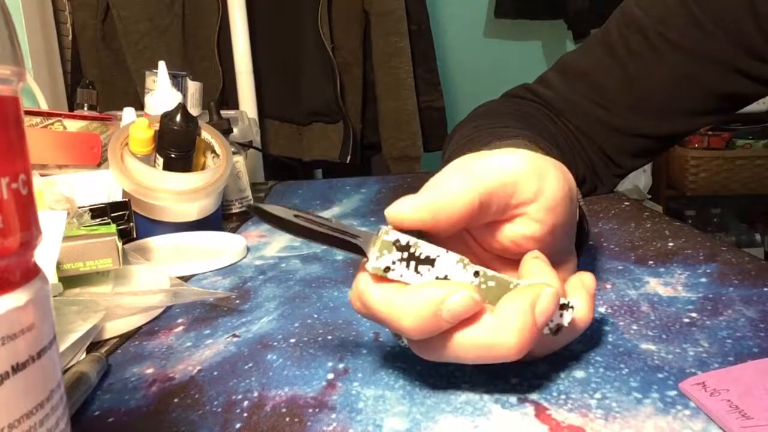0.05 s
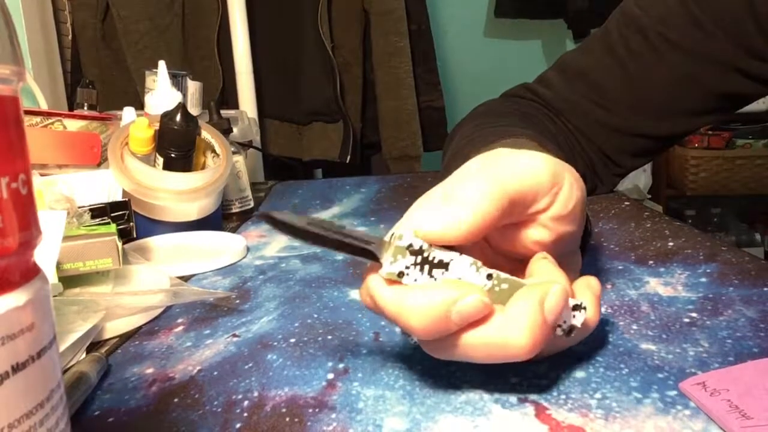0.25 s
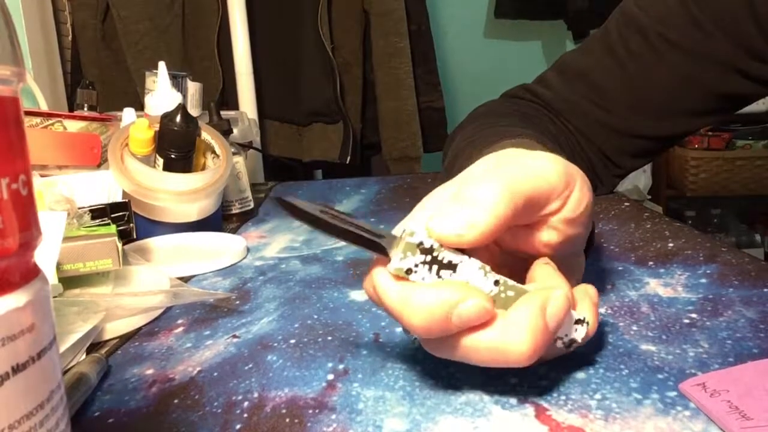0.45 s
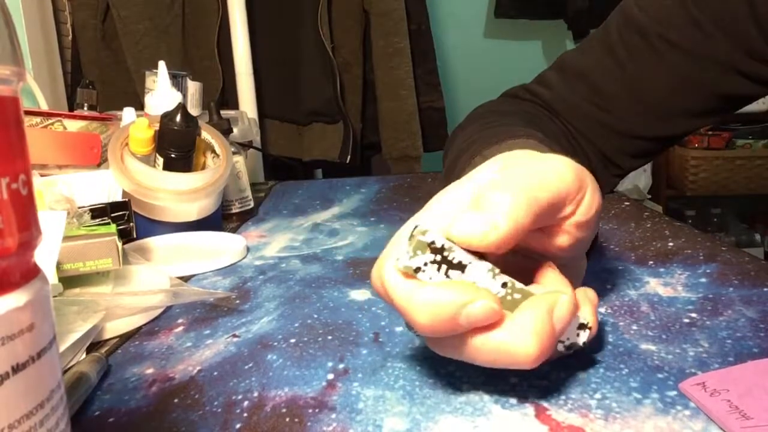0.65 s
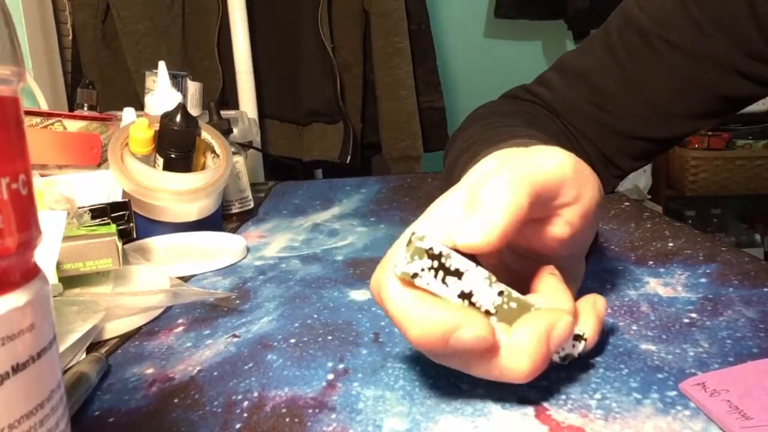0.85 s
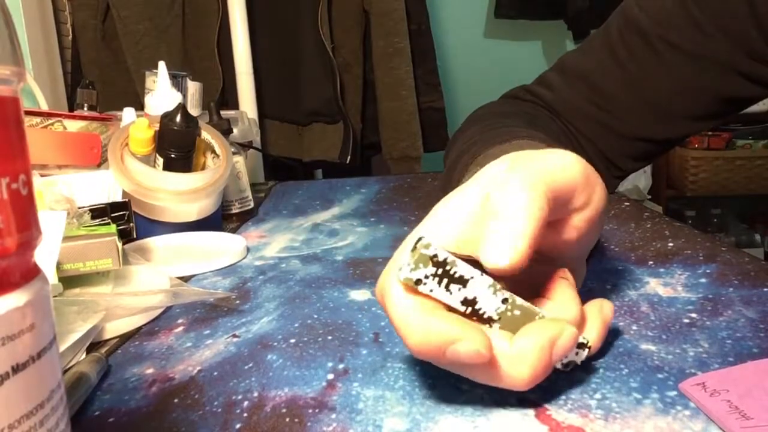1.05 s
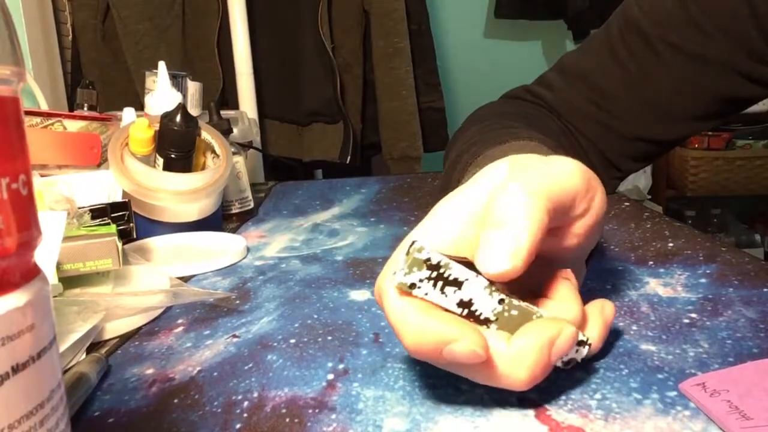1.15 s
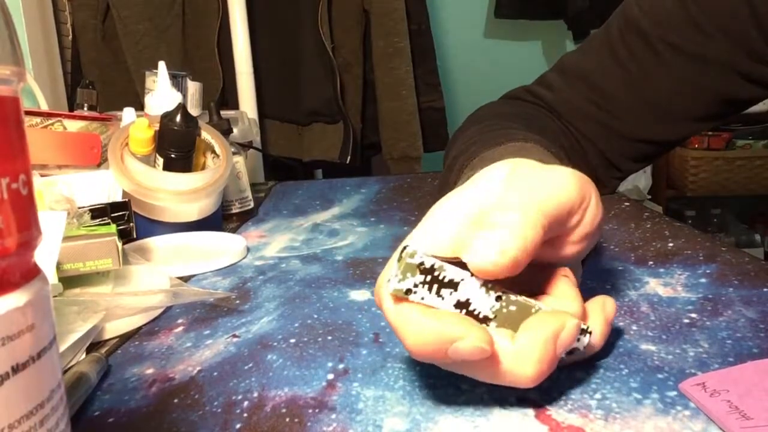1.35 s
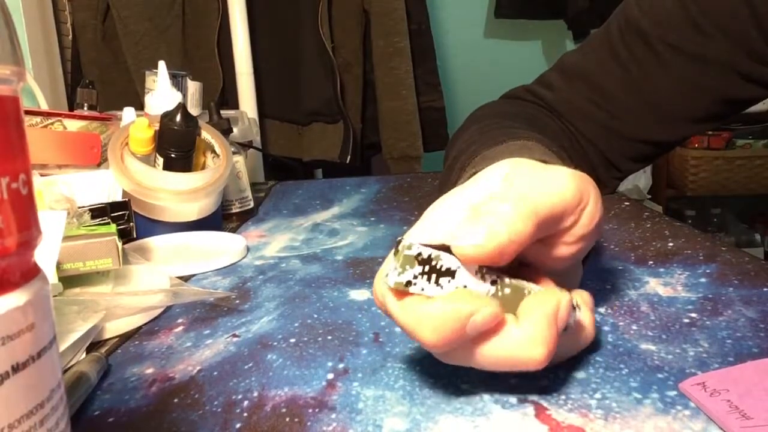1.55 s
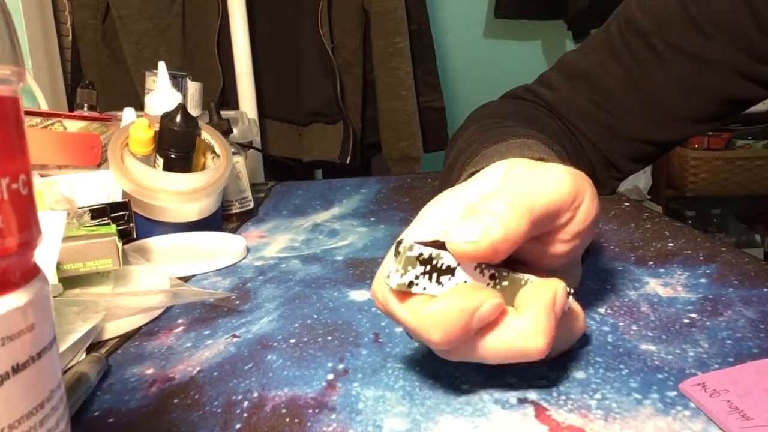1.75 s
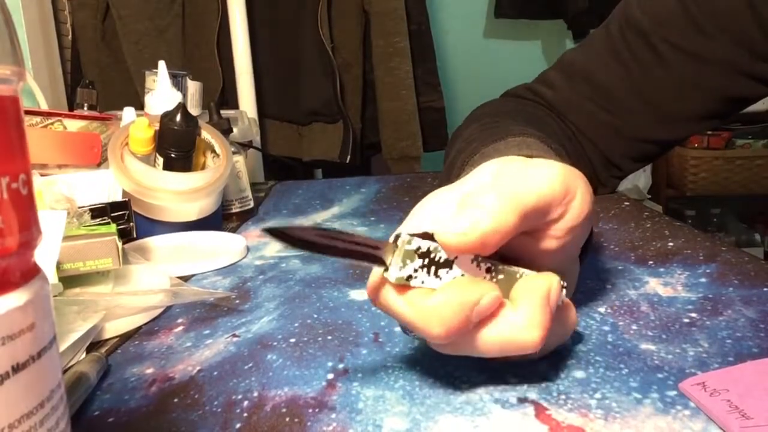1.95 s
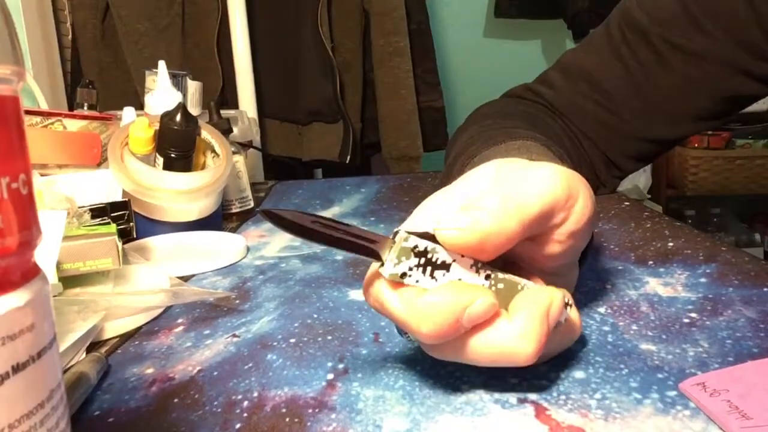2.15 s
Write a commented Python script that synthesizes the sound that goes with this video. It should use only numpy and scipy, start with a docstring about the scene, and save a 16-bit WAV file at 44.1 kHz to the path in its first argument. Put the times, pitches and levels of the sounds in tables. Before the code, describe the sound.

A spring-loaded knife blade snaps in, then snaps back out, with sharp metallic clicks.

```python
"""A spring-loaded knife, held over a desk in a small quiet room, snaps its blade in and later out.
Each snap is a latch letting go, a short scrape of gritty noise along the track and the blade chattering
against its stop: noise bursts coloured by the handle, with steel modes ringing on and a diffuse room tail.
Swelling sines thump in the handle and hand; around the snaps the thumb slider and the spring tick faintly.
Shaped noise makes the quiet room and the rumble of the grip."""
import sys
import numpy as np
from scipy import signal
from scipy.fft import rfft, irfft
from scipy.io import wavfile
from scipy.ndimage import uniform_filter1d, minimum_filter1d

SR = 44100
rng = np.random.default_rng(int(sys.argv[2]) if len(sys.argv) > 2 else 0)


def to_wav(s):
    """Save 16-bit WAV."""
    ch = np.atleast_2d(s).T  # columns
    pcm = np.round(np.clip(ch, -1, 1) * 32767)  # PCM
    wavfile.write(sys.argv[1], SR, pcm.astype(np.int16))


N = 97681  # length [samples]
ROOM_DELAY_S = 0.0055  # from a contact to the start of its room tail

# colour of the inward blade contacts and of every scrape: (frequency [Hz], level [dB])
CLOSING_COLOUR = [(100, -26), (600, -20.5), (950, -36.5), (1400, -21), (2100, -18.5), (2700, -9),
                  (3300, -17), (4100, -9), (4800, -10.5), (5800, 0), (8400, 0), (9200, -3.5), (12000, -1.5),
                  (15500, -0.5)]


def amp(db):
    """Decibels to gain."""
    return 10 ** (np.asarray(db) / 20)


def unit(x):
    """Scales to rms 1."""
    return x / np.sqrt(np.mean(x ** 2) + 1e-20)


def read(points, hz):
    """Reads a table on a log-frequency axis."""
    table_hz, value = np.transpose(points)
    return np.interp(np.log(hz + 1), np.log(table_hz + 1), value)


def add(mix, start_s, sound):
    """Mixes a sound in at a time, cut off at the end of the mix."""
    part = mix[max(round(start_s * SR), 0):][:len(sound)]
    part += sound[:len(part)]


def noise(colour):
    """Steady noise of a given spectrum, at rms 1."""
    hz = np.fft.rfftfreq(N, 1 / SR)
    spectrum = rfft(rng.standard_normal(N)) * amp(read(colour, hz))
    return unit(irfft(spectrum, N))


def background():
    """Quiet room noise and the rumble of the shifting grip, each a coloured noise."""
    # spectrum of the quiet room: (frequency [Hz], relative level per Hz [dB])
    floor_colour = [(15, -57), (25, -23), (35, -7), (49, 0.5), (140, -5.5), (183, -6.5), (313, -12.5),
                    (433, -17.5), (469, -18.5), (666, -18.5), (1170, -21.5), (1750, -21), (15500, -31)]
    # rumble of the grip: (time [s], level [dB])
    grip_levels = [(0, -66), (.3, -67.5), (.8, -74.5), (1.3, -68.5), (1.55, -61.5), (1.78, -66.5),
                   (2.05, -86.5), (2.2, -65.5)]
    # spectrum of that rumble: (frequency [Hz], relative level [dB])
    grip_colour = [(25, -22.5), (70, 1), (160, 0), (300, -13), (700, -29.5), (3000, -40), (16000, -48.5)]
    floor_db = -67.5
    grip_gain = amp(np.interp(np.arange(N) / SR, *np.transpose(grip_levels)))
    return amp(floor_db) * noise(floor_colour) + grip_gain * noise(grip_colour)


def coloured(x, points, tilt_db=0, size=2048):
    """Causal filter of unit energy with the given spectrum, tilted per octave above 2 kHz."""
    hz = abs(np.fft.fftfreq(size, 1 / SR))
    octaves = np.log2(np.maximum(hz, 2000) / 2000)
    log_gain = np.log(amp(read(points, hz) + tilt_db * octaves))
    # minimum phase: the energy comes as early as the spectrum allows
    spectrum = np.exp(np.conj(signal.hilbert(log_gain)))
    taps = np.fft.ifft(spectrum).real[:size // 2]
    return signal.fftconvolve(x, taps / np.linalg.norm(taps))[:len(x)]


def resonant(x, peaks):
    """Lifts each resonance out of the sound, so that it rings briefly."""
    for hz, width_hz, boost_db in peaks:
        b, a = signal.iirpeak(hz, hz / width_hz, fs=SR)
        x = x + (amp(boost_db) - 1) * signal.lfilter(b, a, x)
    return x


def ring(modes):
    """Dying sine modes, each struck at a random phase."""
    t = np.arange(SR // 2) / SR
    total = np.zeros(len(t))
    for hz, db, t60 in modes:
        total += amp(db - 60 * t / t60) * np.sin(2 * np.pi * (hz * t + rng.random()))
    return total


def contact(decay_s, size=4096):
    """Metal meets metal: a crack, a burst of chatter and a weaker rattle, even in spectrum."""
    crack = 0.45  # relative to the energy of the chatter and rattle
    rattle_db, rattle_s = -22, 0.003
    smooth_hz = 256
    t = np.arange(size) / SR
    envelope = np.exp(-t / decay_s) + amp(rattle_db) * np.exp(-t / rattle_s)
    burst = envelope * rng.standard_normal(size)
    burst[0] += crack * np.linalg.norm(envelope)
    # even out the broad spectrum, leaving its fine grain
    spectrum = rfft(burst, 2 * size)
    power = uniform_filter1d(abs(spectrum) ** 2, max(round(smooth_hz * 2 * size / SR), 1))
    even = irfft(spectrum / np.sqrt(power))[:size]
    return unit(even) * np.sqrt(np.mean(envelope ** 2))


def room(colour, size=256):
    """One short dense reverberant tail of noise, each band dying at its own speed."""
    # reverberation time: (frequency [Hz], time to fall 60 dB [s])
    room_t60 = [(100, .15), (1000, 0.11), (3000, 0.16), (7000, 0.26), (11000, .18), (16000, .16)]
    hz, t, bands = signal.stft(rng.standard_normal(SR // 2), SR, nperseg=size)
    t60 = read(room_t60, hz)[:, None]
    # the root gives long and short bands equal energy before the colour
    gain = amp(read(colour, hz))[:, None] * np.sqrt(2 * np.log(1000) / (t60 * SR))
    decay = np.exp(-np.log(1000) * t / t60)
    return signal.istft(bands * gain * decay, SR, nperseg=size)[1]


def ticks():
    """The slider catches, the stretched spring sings faintly and the room answers."""
    # slider and spring ticks: (time [s], level [dB], decay [s], tilt [dB per octave],
    # main resonance [Hz], spring ring relative to the tick [dB])
    tick_events = [(0.2012, -38.5, 0.0018, -3, 5300, -36.5), (0.463, -52, 0.00086, -1.5, 6070, -40.5),
                   (1.1891, -30, 0.00064, 3, 7500, -18.5), (1.468, -59, 0.00066, -7.5, 6150, -42.5),
                   (1.489, -58.5, 0.0014, -2.5, 11730, -40), (1.5182, -49.5, .001, 0.5, 8400, -45),
                   (1.5228, -37.5, 0.00097, 7.5, 13370, -45), (1.595, -55.5, 0.00087, -3, 6000, -38.5),
                   (1.6205, -52, 0.00072, -11.5, 2030, -39), (1.6641, -31, 0.00091, 6, 8250, -28),
                   (1.7999, -60, .003, -4.5, 6380, -42)]
    # colour of the ticks: (frequency [Hz], level [dB])
    tick_colour = [(200, -22.5), (1400, -25.5), (3000, 0), (4000, -11.5), (5400, -5.5), (8200, 0.5),
                   (10700, -9), (12500, 1), (14200, 2.5), (16000, -14.5)]
    # colour of their room tail: (frequency [Hz], level [dB])
    tick_wash = [(100, -25), (2600, -9.5), (7000, -16), (15000, -18.5)]
    # modes of the spring: (frequency [Hz], relative level [dB], time to fall 60 dB [s])
    spring_modes = [(2570, -3.5, .2), (5179, -4.5, .4), (5890, -3.5, .3), (6525, -3, .3), (7200, -3, .25),
                    (7768, 0.5, .19), (8570, -2, .19), (10730, -1.5, .2)]
    width_hz, boost_db = 400, 7
    out = np.zeros(N)
    for s, db, decay_s, tilt_db, hz, ring_db in tick_events:
        catch = coloured(contact(decay_s), tick_colour, tilt_db)
        tick = amp(db) * resonant(catch, [(hz, width_hz, boost_db)])
        add(out, s, tick)
        add(out, s, amp(db + ring_db) * ring(spring_modes) / len(spring_modes))
        add(out, s + ROOM_DELAY_S, signal.fftconvolve(tick, room(tick_wash)))
    return out


def recoil():
    """Jolts of the handle and dull thumps of the hand: sines that swell quickly and die away."""
    # jolts and thumps: (time [s], level at the peak of the swell [dB], pitch [Hz], swell time [s])
    thumps = [(0.214, -51, 140, 0.0049), (0.22, -48.5, 72, 0.0066), (0.5, -39.5, 90, 0.0052),
              (.504, -46, 596.5, 0.00058), (0.5034, -45.5, 190, .003), (1.665, -51, 78, .012),
              (1.806, -38, 95, .008), (1.8559, -6.5, 1200, 0.00022), (1.8571, -12, 212.4, 0.0009),
              (1.857, -15.5, 439, .0006), (1.8604, -22, 69.96, 0.0025)]
    out, t = np.zeros(N), np.arange(SR // 4) / SR
    for s, db, hz, swell_s in thumps:
        swell = t / swell_s * np.exp(1 - t / swell_s)
        add(out, s, amp(db) * swell * np.sin(2 * np.pi * hz * t))
    return out


def small_parts(count=40):
    """Weak, uneven modes of the spring and the small parts, which make the tail metallic."""
    low_hz, high_hz = 2642, 12370
    mean_db, t60 = -57, 0.21
    place, strength = rng.random((count, 2)).T
    mode_hz = low_hz + (high_hz - low_hz) * place
    mode_db = mean_db + 10 * np.log10(-np.log(strength))  # exponentially spread power
    return ring([(hz, db, t60) for hz, db in zip(mode_hz, mode_db)])


def snap(contacts, colour, handle, steel, wash):
    """Contacts crack through the handle and fill the room; the last leaves the steel ringing."""
    cracks, tails = np.zeros((2, N))
    for s, db, decay_s in contacts:
        burst = amp(db) * contact(decay_s)
        add(cracks, s, burst)
        add(tails, s + ROOM_DELAY_S, np.linalg.norm(burst) * room(wash))
    last_s = contacts[-1][0]
    add(tails, last_s, ring(steel) + small_parts())
    return resonant(coloured(cracks, colour), handle) + tails


def closing_snap():
    """The blade is pulled in: the latch lets go, then the blade chatters on the rear stop."""
    # latch, then rear stop: (time [s], level [dB], decay [s])
    contacts = [(.4792, -39.5, 0.003), (.4827, -30.5, 0.00097), (.484, -19.5, 0.00036),
                (.4856, -6, 0.00022), (.4864, -6, 0.00068), (.4896, -23, .001), (.5009, -1.5, .0007),
                (.5021, -9.5, 0.00029), (.5028, -6, 0.00089)]
    # broad resonances of the handle, blade in: (frequency [Hz], width [Hz], boost [dB])
    handle = [(4070, 570, 6.5), (6480, 310, 6.5), (7070, 410, 7.5), (8410, 160, 9), (10040, 110, 5.5),
              (12136, 350, 5)]
    # lasting ring of the steel: (frequency [Hz], level [dB], time to fall 60 dB [s])
    steel = [(2600, -50.5, .2), (2727, -53, 0.14), (3940, -47, .17), (7160, -44.5, 0.2194),
             (7560, -45.5, 0.17), (8430, -38, .1), (10545, -45, 0.091), (10100, -47.5, .23),
             (13330, -37.5, 0.1)]
    # colour of the diffuse wash from the room: (frequency [Hz], level [dB])
    wash = [(100, -30.5), (950, -33.5), (2000, -30.5), (2600, -12.5), (3300, -23), (4100, -15.5),
            (4700, -22.5), (7200, -17.5), (9900, -14), (11200, -19), (12300, -15.5), (15500, -16)]
    return snap(contacts, CLOSING_COLOUR, handle, steel, wash)


def slides():
    """The blade scrapes along its track in gritty noise, with uneven grain strengths."""
    # strokes of the blade: (time [s], length [s], level [dB])
    strokes = [(0.487, 0.005, -24.5), (0.493, 0.006095, -27.5), (1.843, 0.0067, -28),
               (1.8484, 0.0096, -27.5)]
    envelope = np.zeros(N)
    grit = unit(rng.standard_normal(N) * rng.exponential(1, N))
    for s, length_s, db in strokes:
        add(envelope, s, amp(db) * signal.windows.tukey(int(length_s * SR), 0.5))
    return coloured(envelope * grit, CLOSING_COLOUR)


def opening_snap():
    """The blade is thrown out: the latch lets go, then the blade chatters on the front stop."""
    # latch, then front stop: (time [s], level [dB], decay [s])
    contacts = [(1.8325, -44, .0007), (1.8381, -32.5, .001), (1.8392, -23.5, .001), (1.8412, -11, .0005),
                (1.842, -12.5, .0006), (1.8508, -17, .0007), (1.8525, -14, .0004), (1.8556, -1, .0006),
                (1.8571, -14, .0008), (1.8579, -11.5, .0009)]
    # colour of the outward blade contacts: (frequency [Hz], level [dB])
    colour = [(100, -12), (600, -12.5), (950, -27), (1300, -21.5), (2300, -5), (2900, -3.5), (4200, -11.5),
              (5600, -5), (6000, -11.5), (6700, -1), (8300, 2.5), (9700, -8.5), (12500, 0.5), (15500, 1.5)]
    # broad resonances of the handle, blade out: (frequency [Hz], width [Hz], boost [dB])
    handle = [(3015, 67, 5.8), (5630, 110, 6.3), (6670, 219, 10.5), (10440, 200, 8.8), (12380, 380, 8.5),
              (13280, 780, 7.4)]
    # lasting ring of the steel: (frequency [Hz], level [dB], time to fall 60 dB [s])
    steel = [(2800, -52, .27), (2860, -51.5, .16), (2980, -56, .2), (3050, -61.5, 0.14),
             (4730, -52.5, 0.24), (5500, -49, .17), (6900, -50.5, .26), (6700, -50, .28),
             (8043, -43.5, .12), (10440, -50.5, .22), (12010, -44, .15)]
    # colour of the diffuse wash from the room: (frequency [Hz], level [dB])
    wash = [(100, -15), (950, -29), (2000, -32), (2850, -15.5), (3700, -25.5), (5500, -18.5), (6100, -19.5),
            (6700, -15.5), (8200, -15.5), (10500, -16), (13000, -17), (15500, -23)]
    return snap(contacts, colour, handle, steel, wash)


def scene():
    """The knife in its room, over the background."""
    knife = closing_snap() + opening_snap() + slides() + ticks() + recoil()
    return (knife + background())[None]


def record(dry):
    """The microphone's bass cut, a fast limiter on the loudest cracks, then the band limit."""
    low_cut_hz, top_hz = 54, 15850
    ceiling, limit_s = 1, 0.00067
    bass_cut = signal.butter(4, low_cut_hz, "high", fs=SR, output="sos")
    thinned = signal.sosfilt(bass_cut, dry)
    span = max(round(limit_s * SR), 1)
    needed_gain = ceiling / np.maximum(abs(thinned), ceiling)
    gain = uniform_filter1d(minimum_filter1d(needed_gain, span), span)  # hold the dip, then smooth it
    lowpass = signal.firwin(255, top_hz, window=("kaiser", 8), fs=SR)
    return signal.oaconvolve(gain * thinned, lowpass[None], "same")


dry = scene()
out = record(dry)
to_wav(out)
```